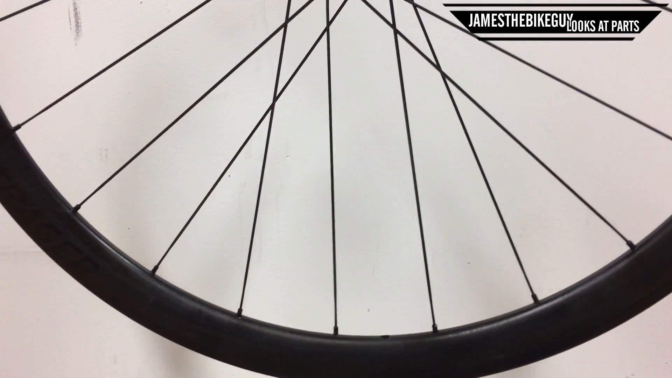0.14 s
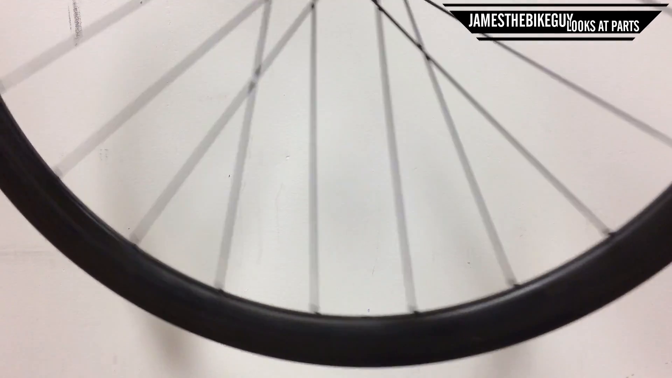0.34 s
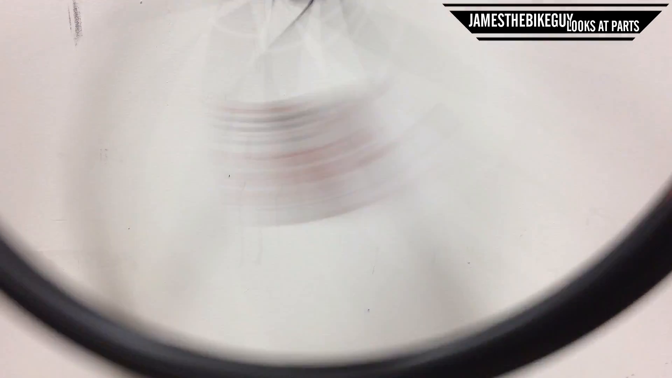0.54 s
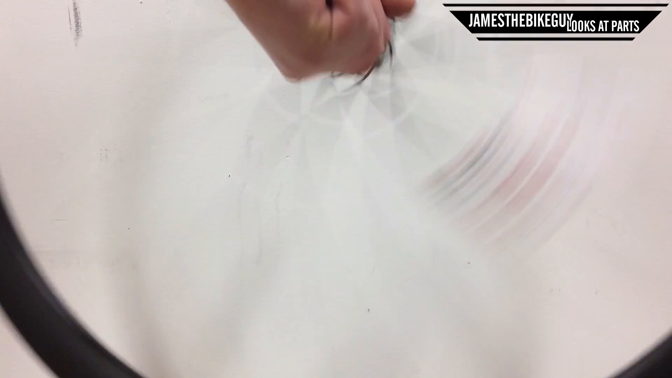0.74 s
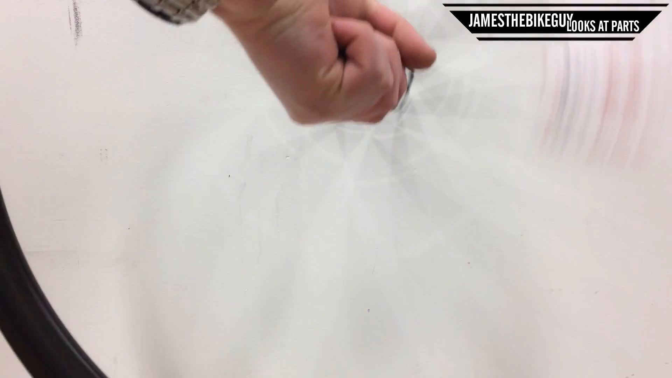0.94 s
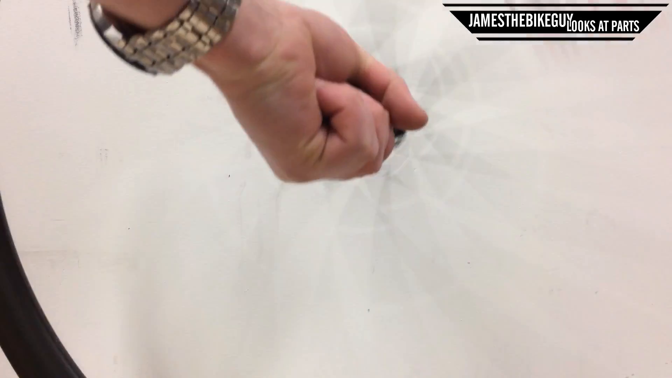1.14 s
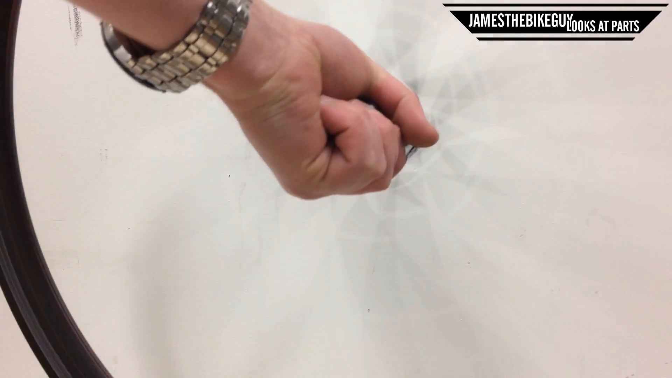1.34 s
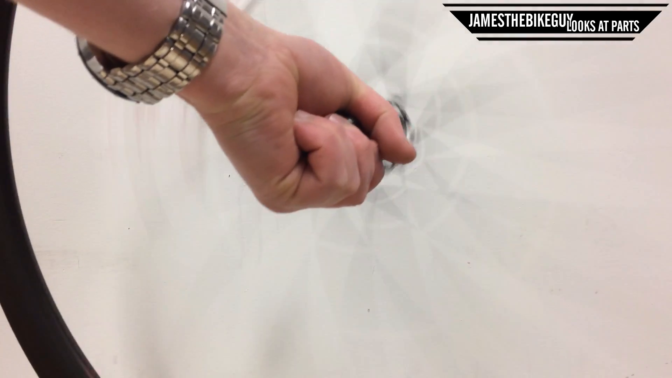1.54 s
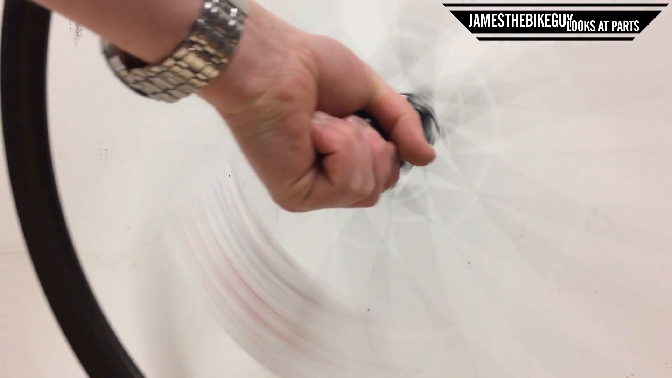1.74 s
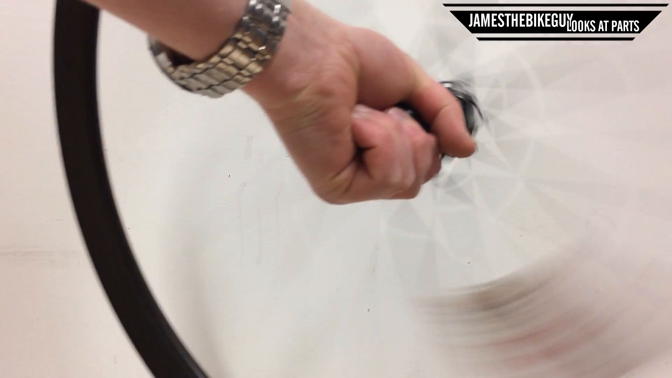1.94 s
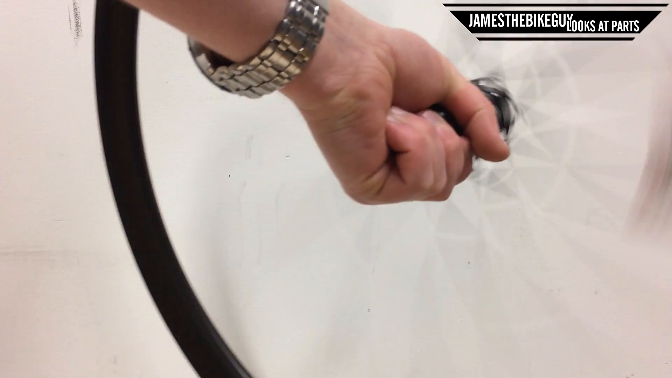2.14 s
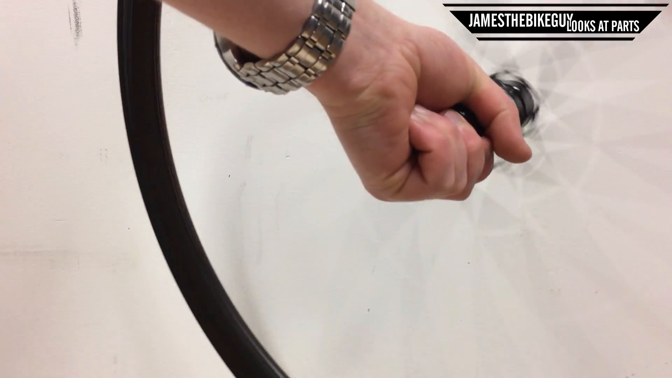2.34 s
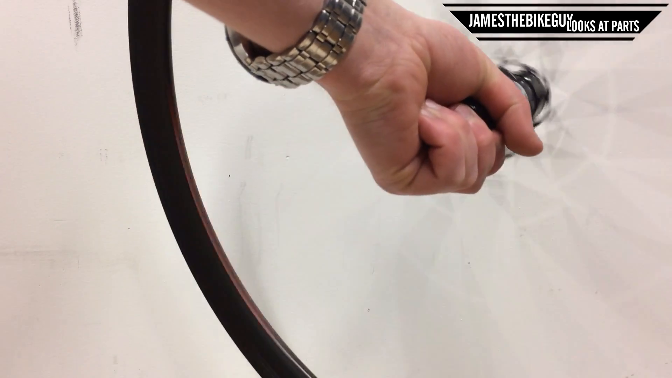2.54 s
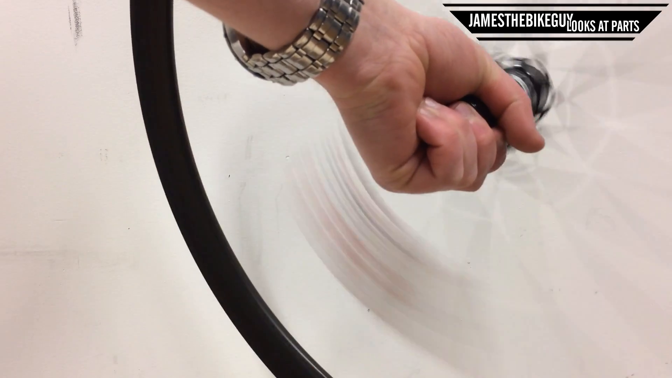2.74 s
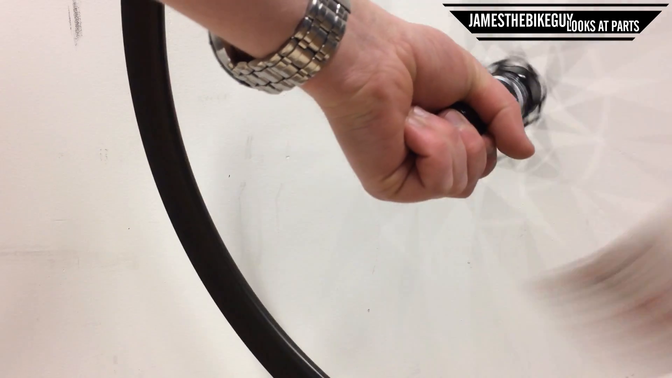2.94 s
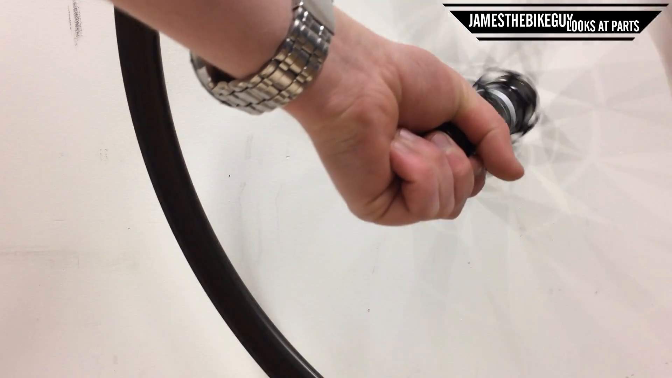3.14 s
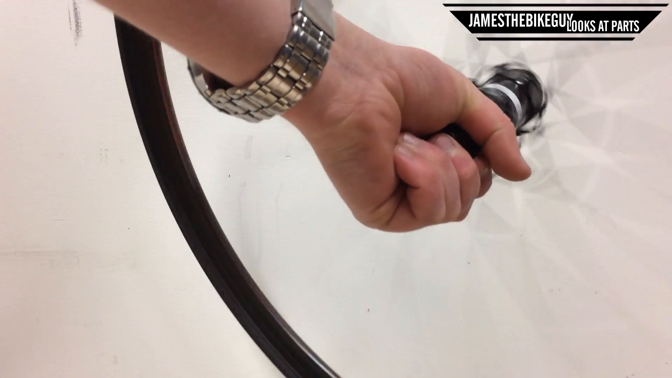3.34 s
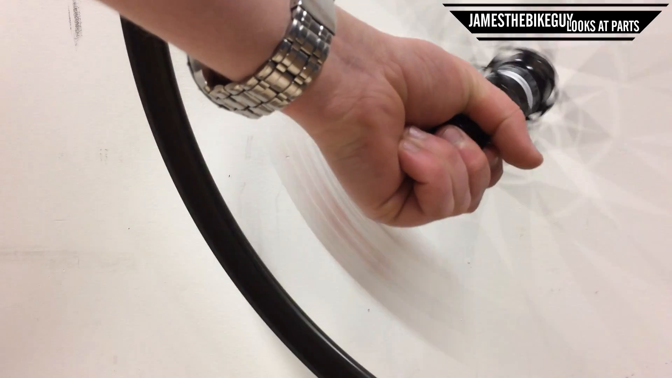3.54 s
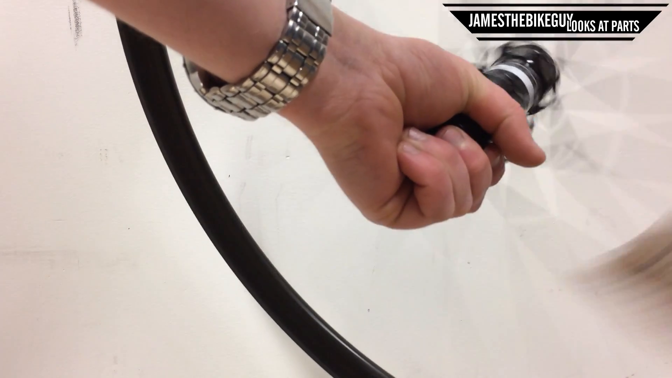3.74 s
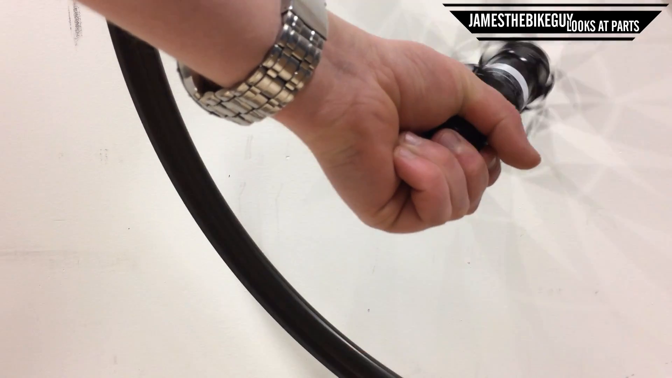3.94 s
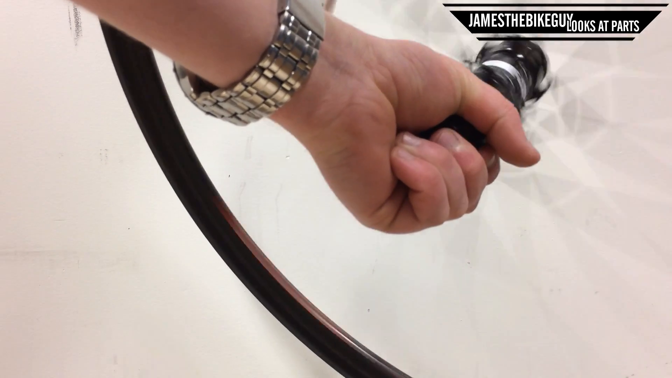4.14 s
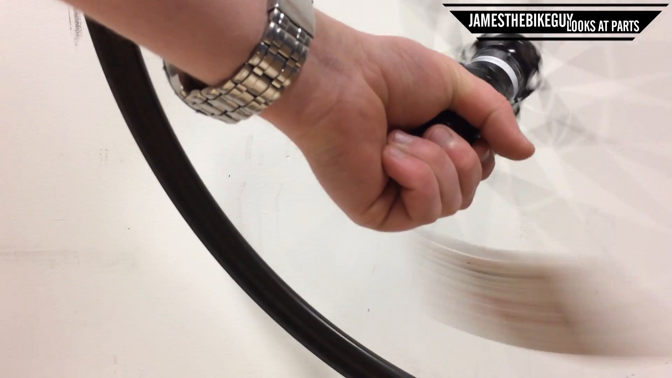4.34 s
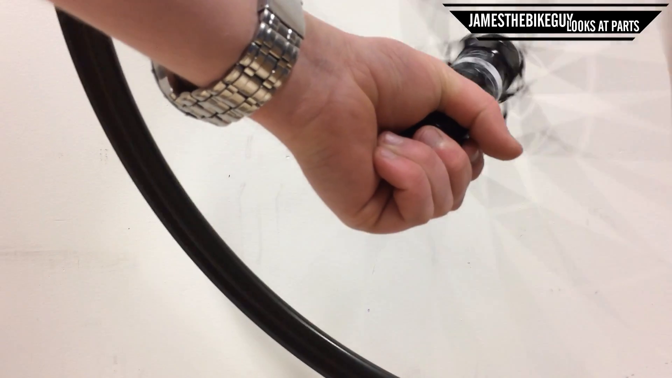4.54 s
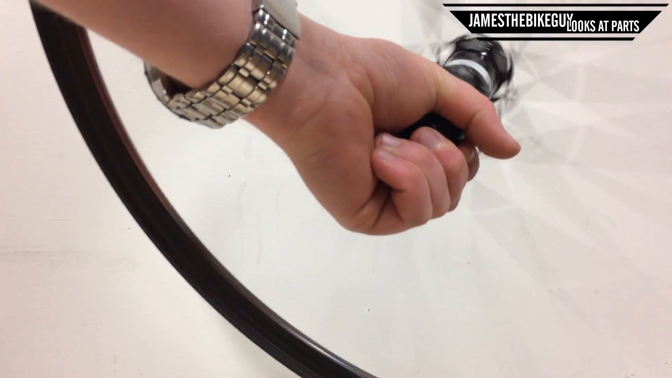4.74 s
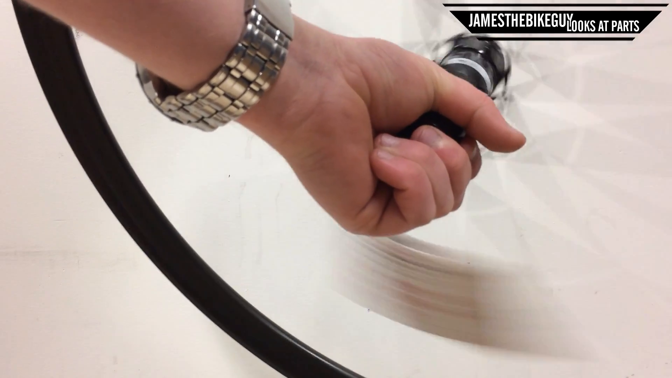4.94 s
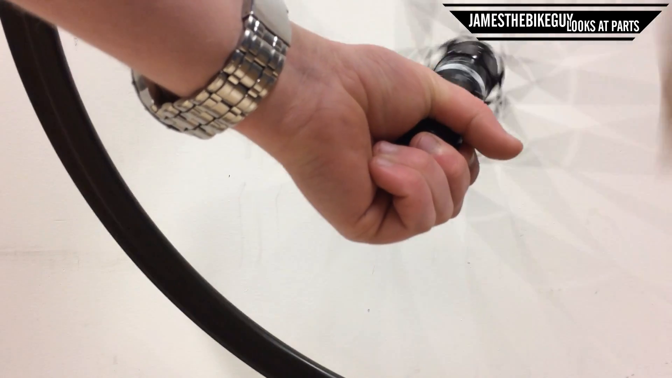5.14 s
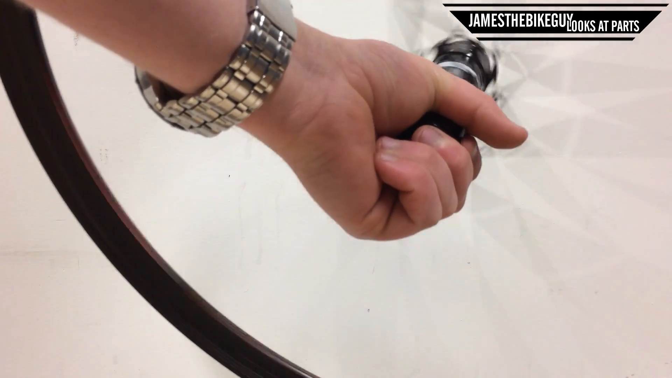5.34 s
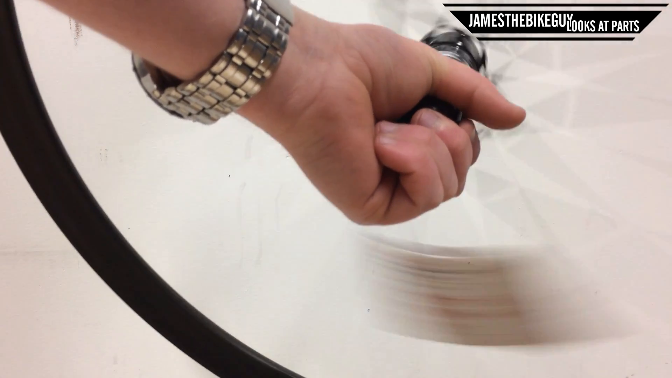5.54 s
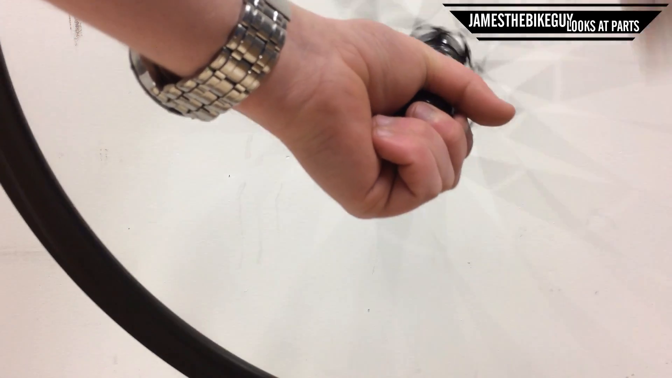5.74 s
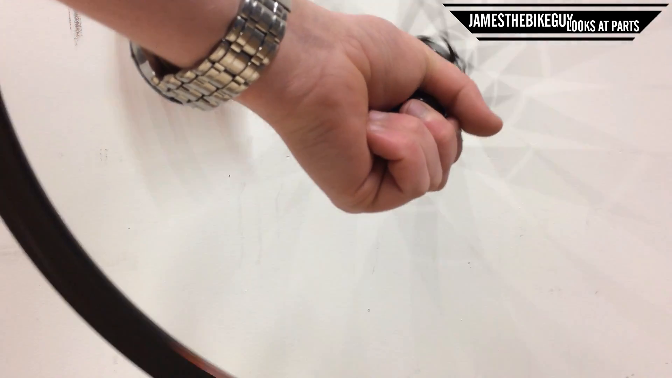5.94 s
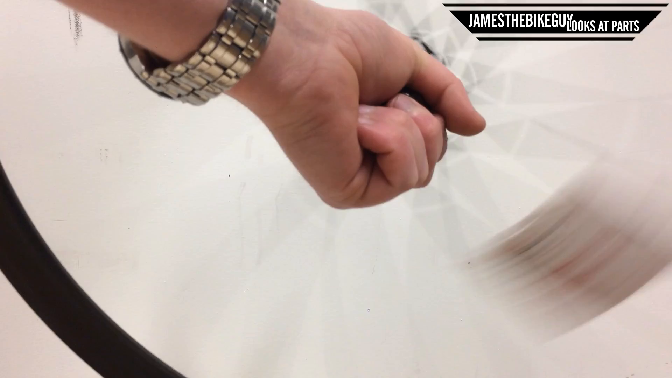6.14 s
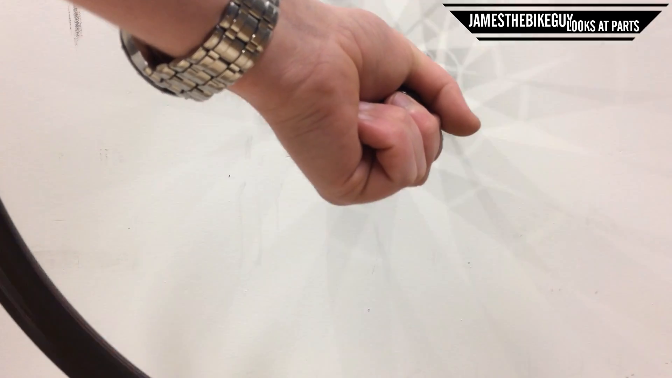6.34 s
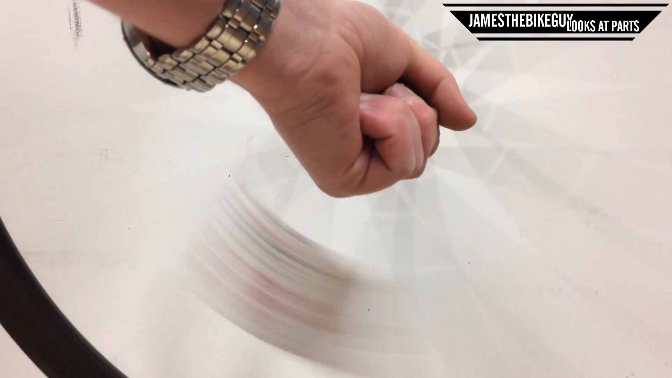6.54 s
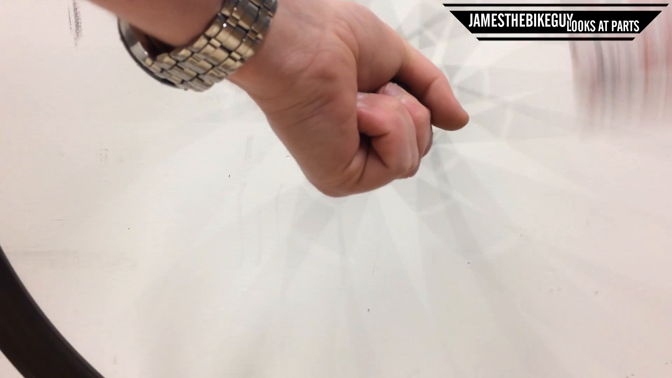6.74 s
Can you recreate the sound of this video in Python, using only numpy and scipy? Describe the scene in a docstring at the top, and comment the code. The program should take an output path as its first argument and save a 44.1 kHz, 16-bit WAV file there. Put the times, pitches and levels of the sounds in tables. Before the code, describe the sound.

After a half-second of quiet room hum, a hand flings a bicycle wheel and its ratchet hub buzzes loudly, pitch slowly sinking as it coasts.

```python
"""Coasting bicycle wheel

A wheel is flung round by hand and coasts in a quiet workshop while the other hand holds the freehub.
Three pawls snap over a 36-tooth ratchet: impulses excite decaying modes of rim, spokes and hub shell, louder
or softer by wheel angle. The rim also answers with steady tones at multiples of the tooth rate. A low hum
follows the wheel, a short reverberation the snaps and knocks; mains hum and filtered-noise ventilation lie below.
One microphone feeds both channels through different tone filters."""
import sys
import numpy as np
from scipy import signal
from scipy.fft import rfft, irfft
from scipy.io import wavfile

SR = 44100
rng = np.random.default_rng(int(sys.argv[2]) if len(sys.argv) > 2 else 0)


def file_out(sig):
    """Save sig as 16-bit WAV at sys.argv[1]."""
    # one column per channel
    cols = np.atleast_2d(sig).T
    # limit, then scale
    lim = np.clip(cols, -1, 1)
    pcm = np.round(lim * 32767).astype(np.int16)
    wavfile.write(sys.argv[1], SR, pcm)


N = 299861   # samples

TEETH = 36   # on the ratchet
# Speeding up under the hand: (time [s], tooth rate [1/s])
THROW_SPEED = [(0.505, 29), (0.546, 45), (0.564, 69), (0.577, 75), (0.588, 120), (0.6, 110), (0.62, 145),
               (0.68, 180)]
# Waxing and waning of the rim: (time [s], ringing near 900 Hz [dB], ringing near 1170 Hz [dB],
# drone above 700 Hz [dB])
RIM_WAXING = [(0.7, 2, 7, -1), (0.95, -6, 0.5, -9), (1.2, -0.5, -1, -16), (2.1, -2, 2, -4),
              (3.0, 3.5, 4, -9), (3.8, 3, -3, 1.5), (4.4, 4, -4, -3), (5.2, -11, 0, 1),
              (6.0, -2.5, -4.5, 0), (6.8, 4, 1.5, 6)]
THROW_START_S, THROW_END_S = THROW_SPEED[0][0], THROW_SPEED[-1][0]
TIME_S = np.arange(N) / SR


def amp(db):
    """Amplitude ratio of a level: 20 dB is a factor of ten."""
    return 10 ** (np.asarray(db) / 20)


def rms_one(x):
    """Normalization of the mean power to one."""
    return x / np.sqrt(np.mean(x ** 2) + 1e-20)


def in_time(rows):
    """Linear interpolation of a table's columns at every sample."""
    s, *columns = np.transpose(rows)
    return [np.interp(TIME_S, s, c) for c in columns]


def at_hz(points, hz):
    """Interpolation of a table's columns over log frequency at moving pitches."""
    f, *columns = np.transpose(points)
    return [np.interp(np.log(hz), np.log(f), c) for c in columns]


def on_bins(points):
    """Interpolation of a (frequency, value) table over log frequency on the FFT bins."""
    bin_hz = np.maximum(np.arange(N // 2 + 1) * SR / N, 1)
    return at_hz(points, bin_hz)[0]


def drift(rate_hz):
    """Random wander of rms 1: white noise through a critically damped low-pass."""
    step = 40   # samples between drawn points
    r = np.exp(-2 * np.pi * rate_hz * step / SR)
    noise = rng.standard_normal(N // step + 2002)
    slow = signal.lfilter([1], [1, -2 * r, r * r], noise)[2000:]   # start-up discarded
    return np.interp(np.arange(N) / step, np.arange(len(slow)), rms_one(slow))


def place(at, sizes):
    """Impulses at fractional positions, each split linearly between the two nearest samples."""
    at = np.clip(at, 0, N - 2)
    whole = at.astype(int)
    part = at - whole
    return np.bincount(whole, sizes * (1 - part), N) + np.bincount(whole + 1, sizes * part, N)


def ring(clicks, hz, t60):
    """Damped resonator: a unit impulse excites a decaying sine of initial height 1."""
    r, w = amp(-60 / (t60 * SR)), 2 * np.pi * hz / SR
    return signal.lfilter([0, np.sin(w)], [1, -2 * r * np.cos(w), r * r], clicks + 1e-18)


def tooth_rate():
    """Angular speed as teeth per second: spin-up by the hand, then a slowing coast."""
    # The holding hand rocks the freehub to and fro: (time [s], tooth rate [1/s])
    coast_speed = [(0.746, 154.7), (0.76, 154.1), (0.843, 155.5), (0.895, 153.7), (0.941, 154.8),
                   (1.006, 152.1), (1.072, 153.9), (1.156, 150.0), (1.184, 150.5), (1.235, 152.7),
                   (1.326, 153.6), (1.387, 152.1), (1.453, 151.3), (1.506, 149.5), (1.565, 150.2),
                   (1.626, 148.4), (1.772, 147.6), (1.887, 147.6), (1.962, 148.2), (2.022, 146.4),
                   (2.173, 143.8), (2.263, 143.1), (2.304, 143.2), (2.346, 142.6), (2.458, 142.6),
                   (2.555, 141.7), (2.626, 140.4), (2.669, 140.2), (2.725, 140.6), (2.805, 140.0),
                   (2.856, 138.9), (2.926, 138.0), (2.977, 138.5), (3.13, 135.4), (3.267, 136.5),
                   (3.417, 134.1), (3.514, 134.1), (3.566, 133.7), (3.679, 131.2), (3.777, 131.3),
                   (3.846, 130.6), (3.916, 129.4), (4.061, 128.8), (4.162, 127.7), (4.209, 126.6),
                   (4.305, 126.3), (4.359, 127.0), (4.389, 127.0), (4.51, 124.6), (4.654, 123.6),
                   (4.713, 122.5), (4.803, 121.7), (4.949, 122.7), (5.089, 119.2), (5.265, 119.1),
                   (5.382, 117.6), (5.492, 117.5), (5.552, 116.8), (5.62, 116.6), (5.724, 114.6),
                   (5.812, 113.8), (5.911, 110.7), (5.973, 109.7), (6.198, 110.9), (6.299, 109.9),
                   (6.399, 108.4), (6.482, 108.0), (6.555, 108.3), (6.647, 107.3), (6.759, 106.5),
                   (6.8, 106.3)]
    return in_time(THROW_SPEED + coast_speed)[0]


def teeth_passed():
    """Angle as the time integral of speed, in teeth since the throw began."""
    return np.cumsum(tooth_rate() * (TIME_S >= THROW_START_S)) / SR


def freehub(teeth, turns):
    """Ratchet excitation: every tooth's pawl impulses set hub shell, rim and pawls sounding."""
    # Levels before the slow-speed loss; the grip on the axle shifts them: (time [s], hub level [dB],
    # ringing near 2.5 kHz [dB], ringing near 3.3 kHz [dB], rim level [dB], hub tilt [dB/octave]);
    # of the two ringings only the departure from their mean counts
    snap_levels = [(0.5, -41, -15, -12, -52, 0), (0.56, -39, -9, -8, -52, 0),
                   (0.62, -39, -16, -7, -52, -1.5), (0.72, -42.5, -15, -9, -52, -2.5),
                   (0.88, -37, -15, -14, -51.5, -1.5), (1.05, -39, -21, -8, -49.5, -3.5),
                   (1.25, -39, -10, -5, -49, -1.5), (1.45, -40, -13, -7, -52.5, -3),
                   (1.63, -37.5, -12, -12.5, -47, -2), (1.85, -40, -20, -7, -60, -2),
                   (1.99, -37.5, -7, -7, -56, -3), (2.06, -43.5, -15, -4, -53.5, -2),
                   (2.2, -40.5, -6.5, -1, -49.5, -3), (2.34, -41.5, -20, -6, -50, -4),
                   (2.45, -40, -12, -4, -51, -1), (2.65, -43, -6, -4.5, -52.5, -3),
                   (2.88, -40, -16, -15, -52.5, -2.8), (2.96, -41, -1, -11, -52, -3),
                   (3.05, -39, -18, -24, -51, -1.5), (3.22, -41, -10, -11, -54.5, -.9),
                   (3.45, -42, -9.5, -8.5, -55, -2.7), (3.64, -41, -5, -6.5, -59, -0.5),
                   (3.72, -41, -8.5, -12, -48.5, -5), (3.93, -40.5, -12.5, -10, -52.5, -1),
                   (4.2, -40, -11, -12, -57, -2.5), (4.45, -39, -10, -14.5, -55, -2),
                   (4.58, -41, -8, -19, -53, -5.5), (4.72, -39, -12, -8, -60, 0),
                   (4.89, -40.5, -8, -18, -68, -1.5), (5.08, -39, -17, -13, -57, -2.5),
                   (5.2, -41, -11, -10, -60, -3), (5.36, -39, -16, -23, -65, -1.5),
                   (5.47, -41, -5.5, -17, -55, -0.5), (5.65, -40.5, -26, -14, -54, -2),
                   (5.85, -41.5, -8, -10.5, -55, -2), (6.07, -41, -9, -18, -58, -2.5),
                   (6.17, -40, -12, -12, -65, -2.5), (6.38, -41.5, -10, -28, -52.5, 0),
                   (6.5, -44.5, -7.5, -1, -55.5, -3.5), (6.62, -41, -10, -12, -56, 4.5),
                   (6.7, -42, -15, -0.5, -65, -1.5), (6.8, -43, -5, -2, -51, -4.5)]
    hub_db, ring_2500_db, ring_3300_db, rim_db, tilt_db = in_time(snap_levels)
    snaps = pawl_snaps(teeth, turns, runout_s=.00004, spread_s=.00011, jitter_s=.000008)
    rattle = chatter(snaps, decay_s=0.0058)
    hub = hub_shell(snaps, rattle, turns, hub_db, ring_2500_db, ring_3300_db, tilt_db)
    rim = rim_rings(snaps, turns)
    tick = pawl_tick(snaps, rattle, turns)
    # below 73 teeth per second the pawls drop softer, by 8 dB per octave of speed
    slow_db = 8 * np.minimum(np.log2(tooth_rate() / 73), 0)
    return amp(slow_db) * (amp(hub_db) * hub + amp(rim_db) * rim + tick)


def pawl_snaps(teeth, turns, runout_s, spread_s, jitter_s):
    """Eccentric ratchet: sample and force of each drop, early and late once a turn by its runout."""
    # The three pawls: (drop lag before stretching [s], force [dB], phase of its runout [rad])
    pawl_drops = [(0.0001, 1.5, 0.059), (0.0011, 8, 0.092), (0.0020, -13.5, 4.2)]
    first = np.searchsorted(teeth, np.arange(1e-6, teeth[-1]))   # first sample of each tooth
    angle = 2 * np.pi * turns[first]
    rate = tooth_rate()[first]
    leading = runout_s * (1 + np.cos(angle + 1.6))
    stretch = np.clip(105 / rate, 1, 1.8)   # the drops spread apart below 105 teeth per second
    late = [leading + lag_s * stretch + spread_s * np.cos(angle + phase) for lag_s, _, phase in pawl_drops]
    # timing is looser up to and just after the end of the throw
    loose = 1 + 4.0 * np.exp(-np.maximum(first / SR - THROW_END_S, 0) / .2)
    late = late + jitter_s * loose * rng.standard_normal((len(first), 3)).T
    force = np.repeat(amp(np.array(pawl_drops)[:, 1]), len(first))
    exact = first - (teeth[first] % 1) * SR / rate
    return np.clip(exact + late * SR, 0, N - 2).ravel(), force


def chatter(snaps, decay_s):
    """Contact rattle: each drop starts an exponentially decaying burst of random micro-clicks."""
    r = np.exp(-1 / (decay_s * SR))
    return signal.lfilter([1], [1, -r], place(*snaps)) * rng.standard_normal(N)


def struck(modes, snaps, turns, scatter_db, wander_db, tilt_db=None, shifts=()):
    """Modal superposition: snaps excite all modes by wheel angle, tilt, shifts, slow wander and chance."""
    exact, force = snaps
    at = exact.astype(int)
    pivot_hz = modes[len(modes) // 2][0]
    out = np.zeros(N)
    for k, (hz, level_db, t60, swing_db, lobes, loudest) in enumerate(modes):
        strength_db = level_db + swing_db * np.cos(2 * np.pi * lobes * (turns[at] - loudest))
        if tilt_db is not None:
            strength_db = strength_db + tilt_db[at] * np.log2(hz / pivot_hz)
        for shift_db, centre_hz, octaves in shifts:
            nearness = np.exp(-(np.log2(hz / centre_hz) / octaves) ** 2)
            strength_db = strength_db + shift_db[at] * nearness
        strength_db = strength_db + scatter_db * rng.standard_normal(len(at)) + wander_db * drift(15.0)[at]
        # each mode radiates from a moving spot: its delay wanders by 60 microseconds rms
        path = .00006 * SR * (3 + np.clip(drift(8.5)[at], -3, 3))
        clicks = place(exact + path, force * amp(strength_db))
        out += (-1) ** k * ring(clicks, hz, t60)   # alternate modes in opposite polarity
    return rms_one(out)


def hub_modes():
    """Normal modes of the shell, turning with the wheel."""
    # (frequency [Hz], relative level [dB], t60 [s], swing [dB], swings per turn, loudest angle [turns])
    shell_modes = [(1430, -0.5, 0.02, 2.2, 1, 0.52), (1522, -2.5, 0.029, 2.7, 1, 0.4),
                   (1649.5, -8.5, 0.046, 1.4, 1, 0.27), (1704, 0, 0.009, 0.73, 1, 1),
                   (1908, -1, 0.0086, 3.6, 1, 0.88), (2216, -10, 0.033, 3.4, 1, 0.83),
                   (2462, -4.5, 0.057, 3.56, 1, 0.35), (2550, -4, 0.023, 5.9, 1, 0.28),
                   (2870, -8.5, 0.021, 2.6, 1, 0.38), (3289, -3, 0.03, 3.2, 1, 0.25),
                   (3224, -0.5, 0.0067, 0.71, 1, 0.22), (3508, -1.5, 0.032, 1.7, 1, 0.11),
                   (3570, 2.5, 0.0025, 0.77, 1, 0.25), (3820, -12.5, 0.034, 0.88, 1, 0.48),
                   (4225, -9, 0.032, 0.36, 2, 0.6), (4520, -8.5, 0.041, 1.5, 2, 0.59),
                   (4840, -12.5, 0.024, 2.2, 2, 0.67), (5153, -21.5, 0.077, 0.52, 1, 0.95)]
    return shell_modes


def hub_shell(snaps, rattle, turns, hub_db, ring_2500_db, ring_3300_db, tilt_db):
    """Modal ringing of the shell; being small, it radiates no lows."""
    # Low ringing near 1.7 kHz, of which the departure from its median against the hub counts:
    # (time [s], level [dB])
    low_ringing = [(0.5, -57), (0.64, -40.5), (0.8, -47), (0.89, -37.5), (1.04, -42.5), (1.18, -40.5),
                   (1.22, -43), (2.29, -46.5), (2.31, -43.5), (2.64, -49), (2.66, -44.5), (2.76, -50),
                   (4.04, -46), (4.1, -55), (4.13, -47), (4.53, -46.5), (4.68, -55), (4.71, -43),
                   (4.97, -50), (5.04, -45), (5.99, -49), (6.15, -49.5), (6.24, -50), (6.45, -45.5),
                   (6.57, -48), (6.8, -50)]
    modes = hub_modes()
    low_db = in_time(low_ringing)[0] - hub_db
    shifts = [(ring_2500_db - ring_2500_db.mean(), 2460, .05),
              (ring_3300_db - ring_3300_db.mean(), 3280, .05),
              (np.clip(low_db - np.median(low_db), -8, 8), 1620, .24)]
    rough = sum(amp(db) * ring(rattle, hz, t60) for hz, db, t60, *_ in modes)
    hub = struck(modes, snaps, turns, scatter_db=1.15, wander_db=2.1, tilt_db=tilt_db, shifts=shifts)
    # the throw shakes the pawls harder: the rattle swells by 20 dB around 0.637 s
    jolt_db = 20 * np.exp(-np.abs(TIME_S - .637) / np.where(TIME_S < .637, .03, .24))
    hub = hub + amp(jolt_db - 19) * rms_one(rough)
    return signal.sosfilt(signal.butter(4, 1300, "high", fs=SR, output="sos"), hub)


def rim_rings(snaps, turns):
    """Modal ringing of the rim, whose mode levels turn with the wheel."""
    # (frequency [Hz], relative level [dB], t60 [s], swing [dB], swings per turn, loudest angle [turns])
    rim_modes = [(156.4, -12, 0.56, 4.5, 1, 0.33), (603, -10, 0.013, -12, 1, 1),
                 (903, -2, 0.069, 4, 2, 0.27), (1056.6, -0.5, 0.075, 9, 4, 0.094),
                 (1176, 5, 0.025, 4, 1, 0.26)]
    ring_900_db, ring_1170_db, _ = in_time(RIM_WAXING)
    shifts = [(ring_900_db, 903, .05), (ring_1170_db, 1170, .05)]
    return struck(rim_modes, snaps, turns, scatter_db=.7, wander_db=2.6, shifts=shifts)


def pawl_tick(snaps, rattle, turns):
    """Impact spectrum: bright, short modes and rattle, limited above by the contact time."""
    # (frequency [Hz], relative level [dB], t60 [s], swing [dB], swings per turn, loudest angle [turns])
    tick_modes = [(5980, 14.5, 0.00068, 0.57, 1, 0.23), (6730, -16.5, 0.074, 2, 1, 0.49),
                  (7250, -2.5, 0.0055, 1.7, 1, 0.47), (8490, 3, 0.0038, 7.6, 1, 0.29),
                  (9810, 13, 0.0015, 8.6, 1, 0.4), (11220, -8, 0.0054, 24, 1, 0.28),
                  (11700, -32, 0.0038, 3.5, 1, 0.4)]
    fizz = sum(amp(db) * ring(rattle, hz, t60) for hz, db, t60, *_ in tick_modes)
    # openings between the spokes sweep past the microphone, with parts once and twice a turn
    once_db = 1.6 * np.cos(2 * np.pi * (turns - .37))
    twice_db = 0.2 * np.cos(4 * np.pi * (turns - .3))
    facing = amp(once_db + twice_db + 1.02 * drift(24.0))
    tick = struck(tick_modes, snaps, turns, scatter_db=1.2, wander_db=.8) + amp(8.5) * rms_one(fizz)
    # a contact lasts too long to reach higher
    tick = signal.sosfilt(signal.butter(2, 12500, fs=SR, output="sos"), tick)
    jolt_db = 10.5 * np.exp(-np.abs(TIME_S - .637) / .045)   # the throw shakes the pawls harder
    settle_db = -5 * np.exp(-((TIME_S - 0.9) / 0.12) ** 2)   # the treble dips briefly after the throw
    return amp(-49.5 + jolt_db + settle_db) * rms_one(facing * tick)


def rim_drone(teeth, turns):
    """Forced vibration: the rim answers at 1 to 8 times the tooth rate, as willingly as each pitch allows."""
    # Rim response: (frequency [Hz], rms level [dB], swing once a turn [dB], swing twice a turn [dB],
    # reference angle of both swings [turns])
    rim_answer = [(135.04, -99, -8, 4, 0.54), (153, -69, 1.5, 2, 0.62), (156.6, -62, -7, 9, 0.5),
                  (153.8, -47, -2, -6, 0.57), (159, -54, 6, -7, 0.83), (170, -70, 0.1, 0.1, .6),
                  (211, -57.5, 5.5, 1, 0.6), (222.7, -44, 2, 0.5, 0.73), (246, -47, 3, -0.5, 0.62),
                  (267.2, -57.5, 5, -2, 0.75), (278.4, -66.5, 3, -2, 0.59), (295.2, -51, 8, -1, 0.48),
                  (304.5, -47, 5, 2, 0.62), (329, -46, -1.5, -1, 0.94), (365, -51, 0.5, 0, 0.58),
                  (405.5, -57.5, 2, 1, 0.52), (418, -52, -1.5, -1.5, 0.36), (449.6, -58, -0.5, 3, 0.46),
                  (456.7, -58.5, 0, 10, 0.2), (465.4, -47, -1, -1.5, 0.54), (536, -57, 0, 0.5, 0.71),
                  (600, -55.5, 0.5, -1, 0.29), (602, -46.5, 0.5, 3, 0.25), (620.7, -71, -2, 7, 0.83),
                  (647, -60.5, -1, -1, 0.28), (658, -56, 3.5, -1, 0.33), (692, -67, 1.5, 4, 0.37),
                  (697, -75.5, -11, 1, 0.32), (770, -71, -0.5, -1, 0.26), (857, -63.5, 6.5, -5, 0.37),
                  (853.6, -58.5, 4.5, 2, 0.28), (906, -75, -6, 3, 0.32), (940, -92, 0, 0, 0.31)]
    upper_db = in_time(RIM_WAXING)[2]
    out = np.zeros(N)
    for multiple in range(1, 9):
        hz = multiple * tooth_rate()
        db, once_db, twice_db, loudest = at_hz(rim_answer, hz)
        angle = 2 * np.pi * (turns - loudest)
        db = db + once_db * np.cos(angle) + twice_db * np.cos(2 * angle) + 2 * drift(9.6)
        db = db + upper_db * np.clip((hz - 680) / 40, 0, 1)
        start_s = THROW_END_S + 0.25 * (multiple > 2)   # tones above the lowest two set in later
        rise = np.clip((TIME_S - start_s) / 0.054, 0, 1)
        out += rise * amp(db) * np.cos(2 * np.pi * multiple * (teeth - .2))
    return np.sqrt(2) * out


def release():
    """Impact excitation: fingers knock the rim, a soft contact being a low-passed impulse."""
    # Fingers on the rim: (time [s], push [dB], contact softness as corner frequency [Hz])
    finger_knocks = [(0.4673, -56, 8800), (0.496, -54, 9000), (0.6064, -33, 9540), (0.618, -25, 450),
                     (0.628, -22, 489), (0.6351, -28.5, 600), (0.6426, -16.5, 5000), (0.6489, -24, 900)]
    # Modes they excite: (frequency [Hz], level for a unit push [dB], t60 [s])
    knock_modes = [(159.6, -23.5, 0.94), (330, 2.5, 0.018), (530, 3.5, 0.0028), (1000, -9, 0.013),
                   (1400, -8, 0.0092), (2150, -7.5, 0.016), (3400, -6, 0.016), (9600, 0, 0.004)]
    t = np.arange(400) / SR
    pushes = np.zeros(N)
    for s, knock_db, soft_hz in finger_knocks:
        contact = t * np.exp(-2 * np.pi * soft_hz * t)
        start = int(s * SR)
        pushes[start:start + 400] -= amp(knock_db) * contact / contact.sum()
    return sum(amp(db) * ring(pushes, hz, t60) for hz, db, t60 in knock_modes)


def spoke_hum(turns):
    """Rotational tone at 21 pulses a turn, probably the spokes fanning the microphone."""
    # Loudest as it sinks past 85 Hz: (frequency [Hz], mean peak level [dB])
    spoke_level = [(62, -63), (65, -48.5), (71, -51.5), (76, -55), (80, -49), (83, -43.5), (85, -40),
                   (87.5, -53.5), (89.5, -49), (100, -73)]
    pulses = 21
    wobble_rad = 1.56 * drift(3.2)
    level_db, = at_hz(spoke_level, pulses * tooth_rate() / TEETH)
    gain = amp(level_db + 3.4 * drift(10.5)) * (TIME_S > THROW_END_S)
    return gain * np.sin(2 * np.pi * pulses * turns + wobble_rad)


def reverb(x, t60_s, wall_hz, sway_per_s):
    """Convolution with decaying noise; wheel and microphone sway, so three such answers take turns."""
    t = np.arange(SR // 2) / SR
    tails = rng.standard_normal((3, len(t))) * amp(-60 * t / t60_s) * (t > .004)
    tails = signal.sosfilt(signal.butter(1, wall_hz, fs=SR, output="sos"), tails)
    sway = 2 * np.pi * sway_per_s * TIME_S + drift(sway_per_s)
    out = np.zeros(N)
    for k, tail in enumerate(tails):
        weight = np.sqrt(2 / 3) * np.cos(sway + k * np.pi / 3)   # squares of the three sum to 1
        out += signal.fftconvolve(weight * x, tail / np.sqrt(np.sum(tail ** 2)))[:N]
    return out


def workshop():
    """Spectrally shaped noise for ventilation, and mains harmonics of unsteady level and phase."""
    # Mains hum: (frequency [Hz], peak level before a lift of 0.5 dB [dB])
    mains = [(60, -52), (120, -50), (180, -50.5)]
    # Ventilation spectrum: (frequency [Hz], relative density [dB per Hz])
    air_spectrum = [(15, -48), (25, -8), (122, -2.5), (188, -14.5), (227, -11.5), (399, -17.5), (895, -28),
                    (2560, -42), (14300, -53.5), (15500, -61)]
    surge_db = drift(.8)
    noise = irfft(rfft(rng.standard_normal(N)) * amp(on_bins(air_spectrum)), N)
    out = amp(-50 + surge_db) * rms_one(noise)
    for hz, db in mains:
        level = amp(db + 0.5 + 2.0 * drift(13.0))
        out += level * np.sin(2 * np.pi * hz * TIME_S + 0.65 * drift(6.4))
    return out


def scene():
    """Superposition of the wheel, its room sound and the background at one microphone."""
    teeth = teeth_passed()
    turns = (teeth - teeth[int(.684 * SR)]) / TEETH   # the wheel angle is zero at 0.684 s
    wheel = freehub(teeth, turns) + release()
    room = amp(-12.5) * reverb(wheel, t60_s=.25, wall_hz=6000, sway_per_s=.9)
    mono = wheel + room + rim_drone(teeth, turns) + spoke_hum(turns) + workshop()
    return np.array([mono, mono])


def record(dry):
    """Complementary channel filters: left bass-heavy and mostly late, right bright; the top is cut."""
    # (frequency [Hz], left minus right level [dB])
    port_balance = [(60, 6.5), (150, 10.5), (380, 8.5), (950, 3.5), (2380, -1.0), (5980, -4), (15000, -1.5)]
    # (frequency [Hz], phase by which left leads [rad])
    port_phase = [(30, .2), (200, -.2), (600, -0.58), (1380, -0.73), (5860, -0.3), (10000, -0.22),
                  (12500, 0.01), (15000, 0.05)]
    ratio = amp(on_bins(port_balance)) * np.exp(1j * on_bins(port_phase))
    shares = np.array([2 * ratio / (1 + ratio), 2 / (1 + ratio)])   # their mean is 1
    tinted = irfft(rfft(dry) * shares, N)
    tinted = signal.sosfilt(signal.butter(2, 38.0, "high", fs=SR, output="sos"), tinted)   # small capsule
    return signal.sosfilt(signal.cheby2(22, 70, 15700, fs=SR, output="sos"), tinted)


dry = scene()
out = record(dry)
file_out(out)
```